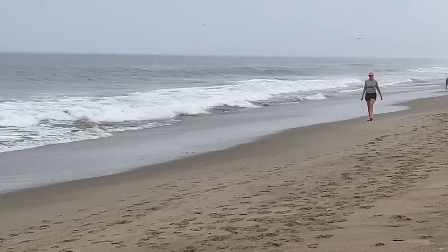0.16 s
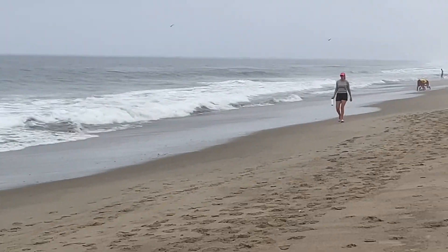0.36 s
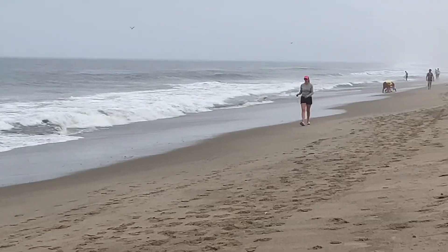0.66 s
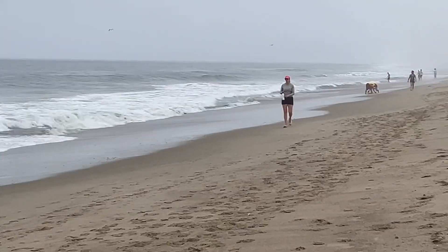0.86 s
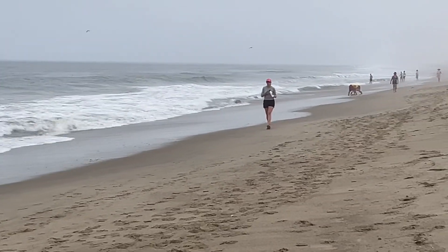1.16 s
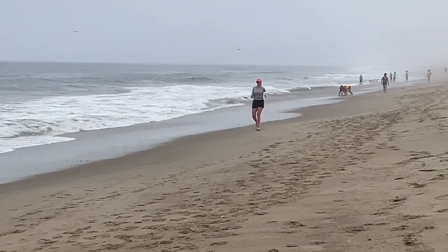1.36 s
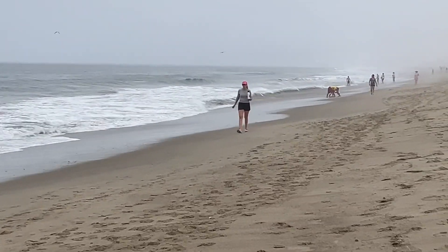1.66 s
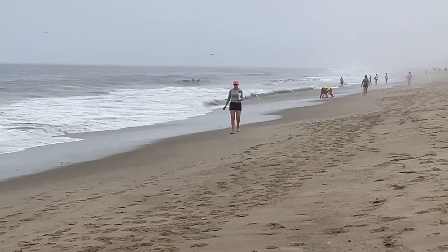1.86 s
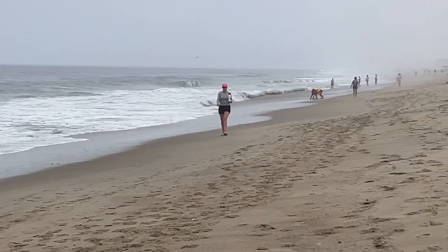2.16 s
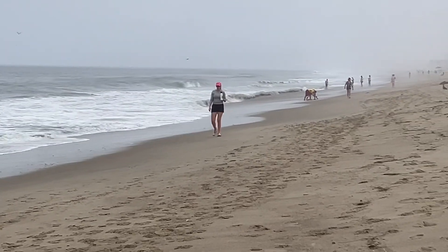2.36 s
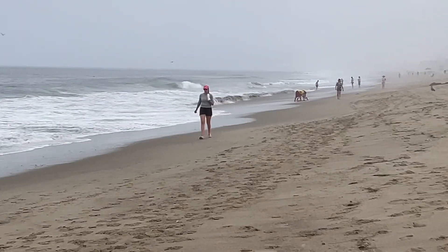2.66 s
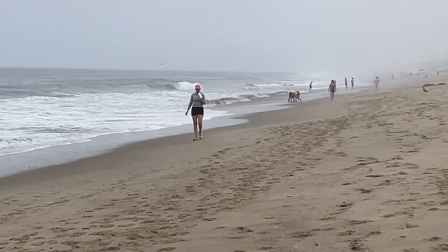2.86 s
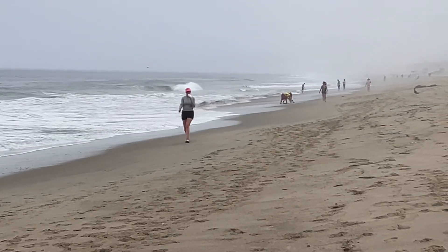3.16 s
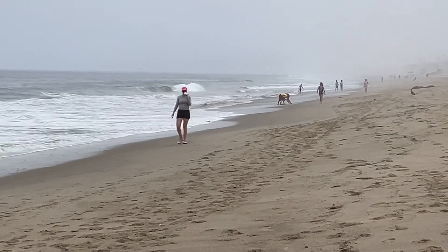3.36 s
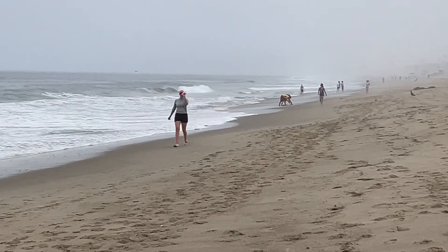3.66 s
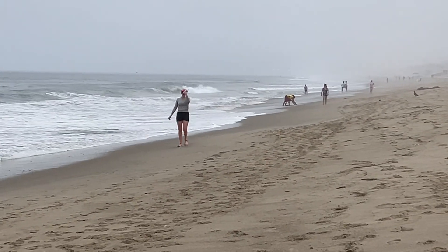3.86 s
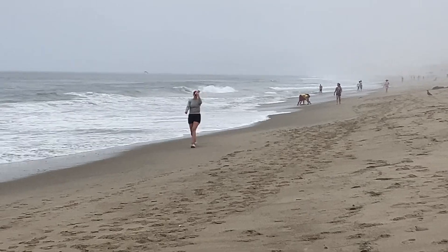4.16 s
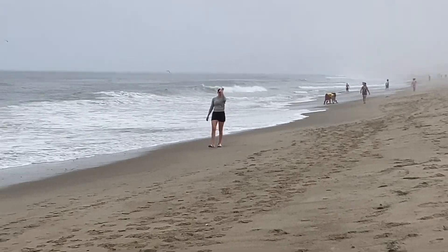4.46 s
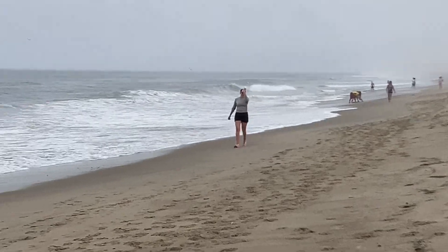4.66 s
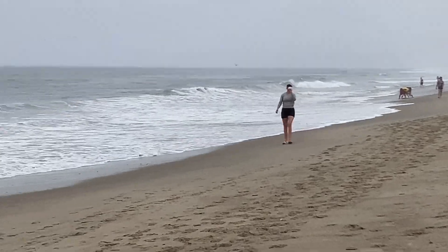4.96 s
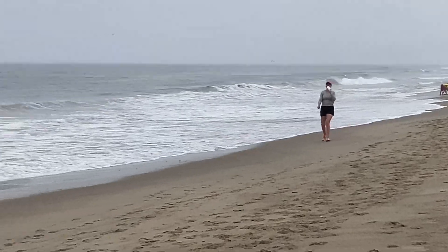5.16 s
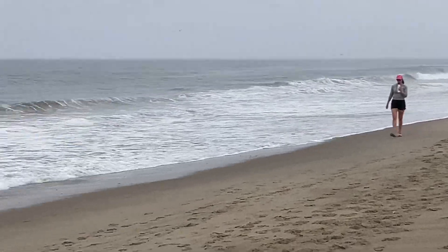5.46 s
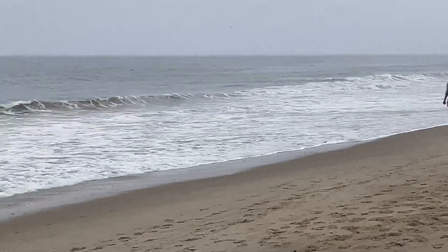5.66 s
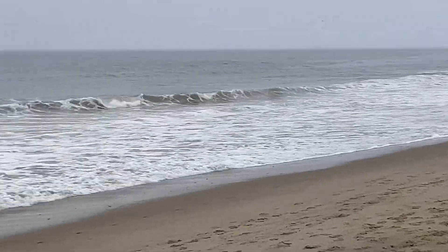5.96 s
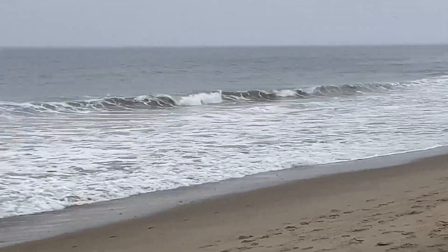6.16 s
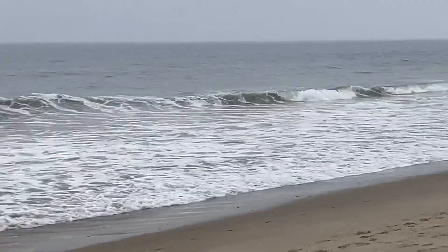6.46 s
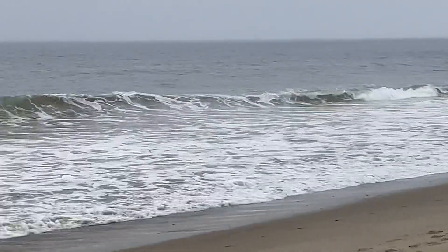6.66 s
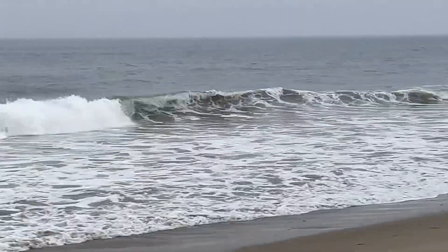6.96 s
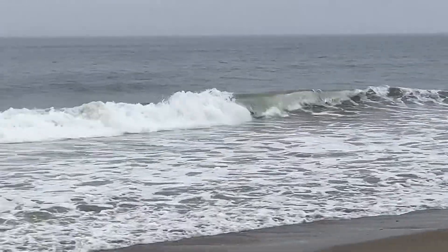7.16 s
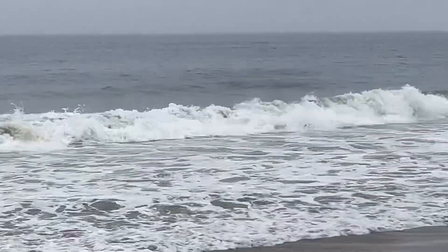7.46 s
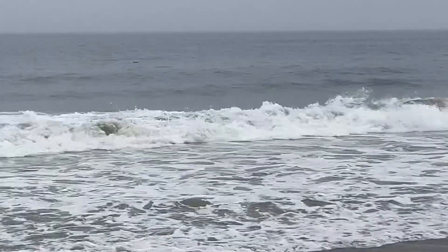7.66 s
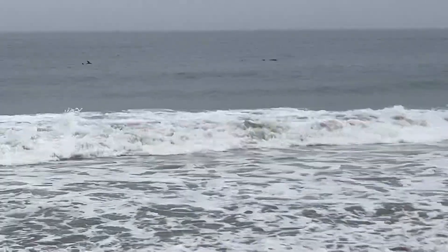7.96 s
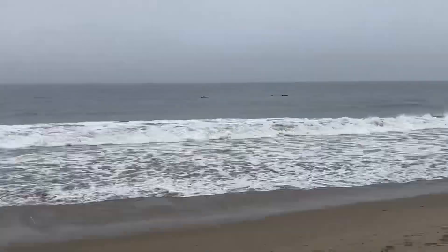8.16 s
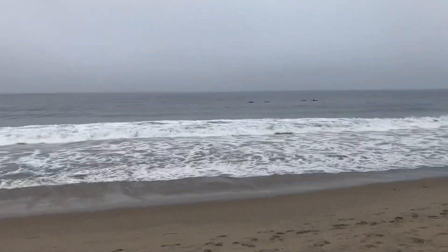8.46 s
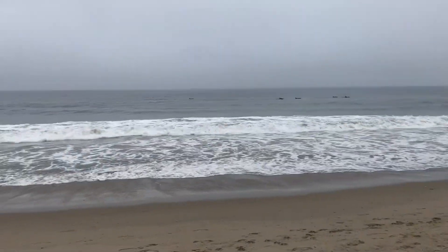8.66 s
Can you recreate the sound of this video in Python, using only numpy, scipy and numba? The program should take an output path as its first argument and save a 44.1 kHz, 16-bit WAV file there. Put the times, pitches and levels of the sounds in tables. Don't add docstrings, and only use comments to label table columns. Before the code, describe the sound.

A handheld stereo microphone on an open beach, sea to the left and ahead. Continuous broad surf roar, quiet at first beneath fluttering, bumping wind. A lull lets the water come forward, then a fresh wash splashes and fizzes up the sand. The roar grows fuller, gusts return with deep overloaded thuds, and a nearby breaker rumbles ahead, then to the right, over lingering hiss.

```python
import sys
import numpy as np
from scipy import signal
from scipy.fft import rfft, irfft, next_fast_len
from scipy.io import wavfile
from numba import njit

SR = 44100
rng = np.random.default_rng(int(sys.argv[2]) if len(sys.argv) > 2 else 0)


def voltage_ratio(decibels):
    exponent = np.asarray(decibels, float) / 20
    return 10 ** exponent


def int16_out(signal):
    q = np.round(np.clip(np.atleast_2d(signal).T, -1, 1) * 32767)
    wavfile.write(sys.argv[1], SR, q.astype(np.int16))


N = 388080
STEP = 40
PUFF_S = 0.017

# time_s, strength_db, large_eddies_db (their share)
WIND_STRENGTH = [(0, -32.5, 3), (0.9, -27, 2), (1.04, -31.5, -14), (2.0, -34, -4), (2.12, -38.5, -4),
                 (2.9, -39, -2.5), (3.55, -46.5, 5), (4.15, -28.5, -10.5), (4.6, -35, -0.5),
                 (5.45, -22, -16), (5.9, -22.5, -8), (6.15, -22.5, -16), (6.4, -24, -3), (6.56, -22, 1.5),
                 (7.04, -24, -1.5), (7.12, -25, 0), (7.45, -25, -12.5), (7.72, -33.5, -7), (7.95, -24, -21),
                 (8.22, -24.5, -16), (8.4, -30, -6), (8.8, -28.5, -11)]
# time_s, lift_db, size (0 small - 1 large)
WIND_PUFFS = [(0.07, 7, 0.33), (0.2, 2, 0.1), (.235, 8, .05), (.025, 2, .1), (0.1, 7.5, 0.1),
              (0.44, 6, 0.42), (0.54, 8, 0.54), (0.64, 8, 0.84), (0.76, 9.5, 0.82), (0.88, 8, 1),
              (1.3, 1, .1), (1.42, 9, 1), (1.75, 2, 0.97), (1.81, 5, 0.82), (1.95, 11, 0.42),
              (2.05, 8, 0.77), (2.3, 3, 0.62), (2.57, 6, .2), (2.76, 11, 0.61), (3.03, 9, .1),
              (4.41, 0, 0.82), (5.0, 3, 0.41), (5.27, 3.5, .1), (5.54, 6, 1), (5.62, 5, 0.77),
              (5.99, 3, .1), (6.07, 4, .3), (6.62, 4, .2), (6.8, 2.5, .1), (6.56, 4, 0.97),
              (6.705, -7, 0.98), (6.83, 10.5, 1), (6.97, 15, 0.6), (7.035, 13, 0.64), (7.31, 19, 0.82),
              (7.49, 9, 0.5), (8.08, 1, .5), (8.14, 4, .6), (8.54, 7, 1)]


def rms_one(x):
    return x / np.sqrt(np.mean(x ** 2) + 1e-20)


def in_time(rows):
    s, *columns = np.transpose(rows)
    grid_s = np.arange(N // STEP + 1) * STEP / SR
    return [np.interp(grid_s, s, column) for column in columns]


def per_sample(slow):
    return np.interp(np.arange(N) / STEP, np.arange(len(slow)), slow)


def held(slow):
    return np.repeat(slow, STEP)[:N]


def at_hz(points, hz):
    point_hz, value = np.transpose(points)
    return np.interp(np.log(hz), np.log(point_hz), value)


def drift(rate_hz):
    run_in = 2000
    r = np.exp(-2 * np.pi * STEP * rate_hz / SR)
    noise = rng.standard_normal(N // STEP + 1 + run_in)
    return rms_one(signal.lfilter([1], [1, -2 * r, r * r], noise)[run_in:])


def bumps(rows, width_s):
    s = np.arange(N // STEP + 1) * STEP / SR
    return sum(db * np.exp(-0.5 * ((s - at) / width_s) ** 2) for at, db in rows)


def band(x, low_hz, high_hz):
    run_in = 4096
    sos = signal.butter(2, [low_hz, high_hz], "band", fs=SR, output="sos")
    return signal.sosfilt(sos, np.concatenate([x[..., -run_in:], x], axis=-1))[..., run_in:]


@njit
def swept_resonance(x, cos_w, r):
    y = np.zeros_like(x)
    for i in range(2, len(x)):
        driven = (1 - r * r) / 2 * (x[i] - x[i - 2])
        y[i] = driven + 2 * r * cos_w[i] * y[i - 1] - r * r * y[i - 2]
    return y


def clicks(shape, per_s, spread_db):
    out = 1.0 * (rng.random(shape) < per_s / SR)
    hit = out > 0
    size_db = spread_db * np.minimum(rng.exponential(1, hit.sum()), 4)
    out[hit] = voltage_ratio(size_db) * rng.choice([-1, 1], hit.sum())
    return rms_one(out)


def pulse(s, peak_db, hz, cycles, glide):
    out, start = np.zeros(N), int(s * SR)
    length = min(int(4 * cycles * SR / hz), N - start)
    turns = np.arange(length) * hz / SR - 2 * cycles
    swell = np.exp(-2 * (turns / cycles) ** 2)
    out[start:start + length] = swell * np.cos(2 * np.pi * turns * (1 + glide * turns))
    return voltage_ratio(peak_db) * out


def pair(mid, side, alike, gain=1):
    alike = np.clip(alike, 0, 1)
    mid = held(gain * np.sqrt((1 + alike) / 2)) * mid
    side = held(gain * np.sqrt((1 - alike) / 2)) * side
    return np.array([mid + side, mid - side])


def right_late(x, lag):
    return np.array([x[0], np.interp(np.arange(N) - lag, np.arange(N), x[1])])


def water(colour, source, spread, tilt_db, shared_db, own_db, rate, pivot_hz=2400, finer=0, fizz_db=0):
    # pitch_hz, likeness (0-1)
    spot_likeness = [(100, .95), (400, .88), (1000, .93), (1950, .92), (2400, .62), (2800, .82),
                     (3700, .78), (4400, .55), (6200, .45), (7300, .3), (8600, .02), (15000, .02)]
    out, together = 0, drift(rate / 3)
    first_hz, last_hz = colour[0][0], colour[-1][0]
    edges = first_hz * 0.85 * 2 ** np.arange(0, np.log2(last_hz / first_hz) + 0.8, 0.4)
    for k, (low, high) in enumerate(zip(edges, np.minimum(edges[1:], 0.45 * SR))):
        hz = np.sqrt(low * high)
        gain_db = at_hz(colour, hz / 2 ** finer) + tilt_db * np.log2(hz / pivot_hz)
        gain_db = gain_db + fizz_db * (hz > 8000)
        gain_db = gain_db + shared_db * together + own_db * drift(rate)
        alike = at_hz(spot_likeness, hz) ** spread
        out = out + pair(*band(source[k % 2], low, high), alike, voltage_ratio(gain_db))
    return rms_one(out)


def roar():
    # time_s, level_db, tilt_db_per_octave (nearness),
    # right_late_samples, colour_up_octaves
    breakers = [(0, -36, -7.5, 9.6, 0.072), (1.3, -38.5, -3, 10.9, 0.041), (1.9, -36.5, -1, 14.6, 0.063),
                (2.7, -36.5, -2, 15.4, 0.18), (3.45, -38.5, 2.5, 13.3, 0.13), (3.7, -36.5, -1, 18.5, 0.14),
                (4.15, -33.5, -1, 22.6, 0.042), (4.62, -36.5, 0.5, 16.8, 0.1), (5.2, -33, 0, 18.7, -0.047),
                (5.9, -34, .8, 17.7, -0.0099), (6.5, -32, -0.3, 18.2, 0.04), (7.2, -32.5, -1, 17.2, 0.07),
                (7.9, -34, .5, 14.7, -0.027), (8.3, -36.5, -1, 15, -0.032), (8.8, -35.5, 1.5, 19, -0.087)]
    # pitch_hz, level_db per Hz
    roar_colour = [(90, -19), (150, -18.5), (300, -16), (420, -3.5), (580, 3), (780, -2), (1000, -2),
                   (1600, -9), (2200, -16.5)]
    level_db, tilt_db, lag, finer = in_time(breakers)
    noise = water(roar_colour, rng.standard_normal((2, 2, N)), spread=3.5, tilt_db=tilt_db,
                  shared_db=0.5, own_db=1.58, rate=8.9, pivot_hz=620, finer=finer)
    return right_late(per_sample(voltage_ratio(level_db + 5.5)) * noise, per_sample(lag))


def wash():
    # time_s, level_db, spread (1 = one spot), right_late_samples, fizz_db
    foam = [(0, -44, 3.6, 20.7, -1), (.9, -45.5, 4.6, 20.8, -1.8), (2.0, -47.5, 4.6, 20.4, -0.5),
            (3.2, -47.5, 2.4, 18.3, 1), (3.43, -47, 2.5, 20, 2), (3.58, -44, 2.4, 16.3, -1),
            (3.63, -38, 0.67, 17, .7), (4.0, -39.5, 1.1, 17.8, 0), (4.4, -37, 1.4, 18.4, -0.7),
            (5.2, -37.5, 2.1, 17.2, .1), (5.8, -38.5, 2.8, 18.1, -2.5), (6.5, -39, 3.9, 18, -1.5),
            (7.3, -39, 4.2, 18.8, -0.5), (7.7, -40.5, 4.1, 20, 0.5), (8.15, -39, 2.4, 20.8, 2),
            (8.35, -42, 4.8, 23, -1), (8.8, -41.5, 3.4, 29, 1.2)]
    # pitch_hz, level_db per Hz
    foam_colour = [(500, -7), (1000, 1.5), (1400, 5), (1650, 1.5), (2100, -0.5), (3200, -3), (4500, -8),
                   (5300, -8.5), (7000, -12), (9000, -16), (10100, -18.5), (11000, -19), (13000, -31),
                   (14300, -37), (15500, -21.5)]
    # time_s, lift_db
    surges = [
        (0.37, 0.5),
        (1.62, 1),
        (3.7, 3),
        (3.88, 5.5),
        (4.02, 4.5),
        (4.24, 3.5),
        (4.88, 0.5),
        (5.73, 0),
        (6.15, 0.5),
        (6.42, -1),
    ]
    # time_s, lift_db
    splashes = [
        (.375, 2.7),
        (3.635, 1.8),
        (3.87, 1.5),
        (4.13, 0.9),
    ]
    level_db, spread, lag, fizz_db = in_time(foam)
    octaves = np.log2(np.maximum(spread, 0.5))
    source = rng.standard_normal((2, 2, N)) + 0.26 * clicks((2, 2, N), 4000.0, spread_db=3.5)
    noise = water(foam_colour, source, 2 ** octaves, tilt_db=0.465 * (1 + octaves), shared_db=0.35,
                  own_db=0.9, rate=23.0, finer=0.13 * octaves, fizz_db=fizz_db)
    level_db = level_db + bumps(surges, width_s=0.067) + bumps(splashes, width_s=0.024)
    return right_late(per_sample(voltage_ratio(level_db + 6.5)) * noise, per_sample(lag))


def crest():
    # time_s, level_db, right_late_samples
    collapse = [
        (0, -70, 0.5),
        (6.6, -61, 0.5),
        (7.05, -36.5, 0.5),
        (7.5, -36.5, 1),
        (8.0, -37, -9),
        (8.4, -33, -10),
        (8.8, -34.5, -16),
    ]
    level_db, lag = in_time(collapse)
    noise = rms_one(band(rng.standard_normal((2, N)), 403, 787))
    gain = voltage_ratio(level_db + 2.2 * drift(17.0))
    return right_late(pair(*noise, 0.92 + 0 * lag, gain), per_sample(lag))


def bubble():
    # time_s, peak_db, pitch_hz
    bursts = [
        (3.462, -29.5, 2770),
    ]
    ring = sum(pulse(s, db, hz, cycles=5.6, glide=0.015) for s, db, hz in bursts)
    return ring * voltage_ratio([[1.0], [4.0]])


def wind():
    # time_s, right_late_samples, likeness (0-1)
    crossing = [(0, -6, 0.77), (.8, -20, 0.85), (1.4, 3, 0.67), (2.1, -16, 0.73), (3, -20, 0.76),
                (4, -8, 0.67), (4.7, 8, 0.8), (5.2, 13, 0.82), (5.8, 20, 0.7), (6.3, 12, 0.78),
                (7.4, 8, 0.91), (8, -1, 0.81), (8.8, -3, 0.94)]
    lag, alike = in_time(crossing)
    eddies = rng.standard_normal((2, N)) + 0.3 * clicks((2, N), 110.0, spread_db=2.0)
    large = pair(*buffet(eddies), alike) + lumps()
    small = pair(*-flutter(eddies), alike) + thumps() + ticks()
    return right_late(large, 0.27 * per_sample(lag)) + right_late(small, per_sample(lag))


def buffet(eddies):
    strength_db, large_db = in_time(WIND_STRENGTH)
    puffs_db = bumps([(s, db * size) for s, db, size in WIND_PUFFS], PUFF_S)
    level_db = strength_db + large_db + puffs_db - 1.5 + 0.57 * drift(31.0)
    return per_sample(voltage_ratio(level_db)) * rms_one(band(eddies, 42.4, 101.0))


def flutter(eddies):
    # time_s, rate_hz
    shedding = [(0.0, 205), (0.93, 150), (1.03, 300), (2.2, 290), (3.0, 340), (3.5, 370), (3.77, 210),
                (3.95, 370), (4.61, 200), (5.22, 310), (5.27, 215), (5.6, 145), (5.88, 180), (5.98, 186),
                (6.64, 187), (7.3, 170), (7.43, 320), (8.18, 154), (8.36, 300), (8.46, 140), (8.7, 271),
                (8.8, 170)]
    strength_db, _ = in_time(WIND_STRENGTH)
    puffs_db = bumps([(s, db * (1 - size)) for s, db, size in WIND_PUFFS], PUFF_S)
    level_db = strength_db + puffs_db - 2.0 + 1.46 * drift(45.0)
    pitch_hz = in_time(shedding)[0] * 2 ** (0.11 * drift(11.0))
    broad = band(eddies, 107.0, 430)
    cos_w = np.cos(2 * np.pi * 1.004 * per_sample(pitch_hz) / SR)
    r = np.exp(-np.pi * 230 / SR)
    tuned = np.array([swept_resonance(port, cos_w, r) for port in broad])
    return per_sample(voltage_ratio(level_db)) * rms_one(rms_one(tuned) + 0.5 * rms_one(broad))


def thumps():
    strikes = [(0.064, -25, 105), (0.148, -15, 144), (0.182, -22, 110), (0.305, -16, 94.5),
               (0.43, -18, 127), (0.544, -22, 95), (0.9, -15.5, 109), (0.936, -28, 134), (1.342, -30, 254),
               (1.654, -21, 189), (1.738, -22, 242), (1.828, -23, 225), (1.938, -21, 170),
               (2.025, -15, 292), (2.306, -32, 128), (2.593, -27, 199), (2.676, -31, 169),
               (2.755, -30, 139), (2.848, -25, 226), (3.01, -25, 257), (3.05, -26, 244),
               (3.163, -21.5, 228), (3.188, -25, 236), (3.341, -26, 230), (3.426, -34, 160),
               (3.598, -26.5, 216), (3.723, -24, 240), (3.921, -30, 245), (4.161, -20, 268),
               (4.196, -24, 234), (4.248, -21, 231), (4.422, -24, 112), (4.559, -28, 114), (4.67, -33, 132),
               (4.746, -30, 180), (5.022, -20, 234), (5.274, -27, 213), (5.357, -12, 188),
               (5.725, -15, 151), (5.857, -10, 158), (5.921, -16, 191), (6.285, -19, 159),
               (6.465, -15.5, 149.8), (6.533, -13, 132), (6.587, -12, 117), (6.7, -6.5, 117),
               (6.838, -9, 124), (6.969, -15, 118), (7.025, -7.5, 129), (7.292, -21, 120),
               (7.323, -18, 171), (7.492, -17, 235), (7.632, -23, 258), (8.45, -17, 181), (8.541, -25, 145),
               (8.676, -27, 257)]
    tail_db, tail_pitch, tail_late_cycles = -11, 0.57, 1.17
    out = np.zeros(N)
    for s, db, hz in strikes:
        out -= pulse(s - 2.2 / hz, db, hz, cycles=1.1, glide=-0.15)
        tail_s = max(s + (tail_late_cycles - 1.6 / tail_pitch) / hz, 0)
        out += pulse(tail_s, db + tail_db, hz * tail_pitch, cycles=0.804, glide=-0.15)
    return out


def lumps():
    rolls = [(.015, -20, 69.5), (.185, -19.5, 75), (.305, -25, 72), (.54, -26, 65), (.76, -21, 80),
             (.83, -23, 80), (1.23, -34, 50), (1.41, -33, 60), (4.42, -29, 80), (4.56, -22.5, 72),
             (4.98, -31, 60), (5.6, -27, 65), (6.499, -15.5, 70), (6.565, -10, 66), (6.597, -13, 66),
             (6.66, -21, 55), (6.725, -22, 68), (6.77, -15, 74), (6.89, -17, 78), (6.974, -15, 62),
             (7.005, -19, 62), (7.035, -9, 66), (7.23, -24, 80)]
    return sum(pulse(max(s - 2.2 / hz, 0), db, hz, cycles=1.1, glide=-0.08) for s, db, hz in rolls)


def ticks():
    strength_db, _ = in_time(WIND_STRENGTH)
    snaps = band(band(clicks(N, per_s=22.0, spread_db=1.2), 70, 650), 90, 900)
    level_db = -43 + 0.17 * (strength_db + 34.5)
    return per_sample(voltage_ratio(level_db)) * rms_one(snaps)


def spray():
    return voltage_ratio(-66) * rms_one(band(rng.standard_normal((2, N)), 15000, 17000))


def shaded(x):
    # pitch_hz, right_port_db
    body_shade = [(100, 0), (250, -0.5), (450, -3), (700, -4), (1100, -4.5), (1500, .5), (2000, -1.2),
                  (2400, 0.6), (3100, 3), (4300, 0.8), (5300, 0.3), (7000, 1), (16000, 0)]
    size = 2 * next_fast_len(N // 2)
    hz = np.arange(size // 2 + 1) * SR / size + 1
    cepstrum = irfft(np.log(voltage_ratio(at_hz(body_shade, hz))), size)
    cepstrum[1:size // 2] *= 2
    cepstrum[size // 2 + 1:] = 0
    right = irfft(rfft(x[1], size) * np.exp(rfft(cepstrum)), size)[:N]
    return np.array([x[0], right])


def shadow(x):
    # time_s, hollow_depth (0-1), hollow_hz, lift_beside (0-1)
    turning = [
        (0, 0.36, 2470, 0),
        (1.5, 0.6, 2520, 0.05),
        (3.4, 0.4, 2450, 0),
        (3.65, 0.76, 2270, 0.48),
        (4.3, 0.67, 2280, 0.5),
        (4.8, 0.76, 2320, 0.24),
        (5.9, 0.4, 2320, 0.25),
        (7.2, 0.48, 2460, 0.03),
        (8.0, 0.2, 2600, 0),
        (8.8, 0.4, 2400, 0),
    ]
    depth, hollow_hz, lift = map(per_sample, in_time(turning))

    def ring(hz, width_hz):
        cos_w = np.cos(2 * np.pi * hz / SR) + np.zeros(N)
        return swept_resonance(x[1], cos_w, np.exp(-np.pi * width_hz / SR))

    hollow = np.clip(depth, 0, 1) * ring(hollow_hz, width_hz=1620)
    beside = ring(1480, width_hz=530) + ring(3050, width_hz=530)
    return np.array([x[0], x[1] - hollow + lift * beside])


def with_ridge(x):
    # time_s, pitch_hz, lift (0-1)
    ridge_path = [(0, 1900, 0.6), (1.0, 1940, 0.5), (2.2, 2050, 0.18), (3.2, 2220, 0.1), (3.62, 1790, 0.3),
                  (3.88, 1970, 0.45), (4.2, 1650, .4), (4.6, 1750, 0.1), (5.0, 1900, 0.1), (5.7, 1760, 0.46),
                  (6.3, 1900, .3), (7.0, 2000, 0.53), (7.6, 1950, 0.45), (8.15, 1950, 0.5), (8.45, 1750, 0.2),
                  (8.8, 1650, 0.1)]
    hz, lift = map(per_sample, in_time(ridge_path))
    cos_w = np.cos(2 * np.pi * hz / SR)
    r = np.exp(-np.pi * 180 / SR)
    return x + np.clip(lift, 0, 1) * np.array([swept_resonance(port, cos_w, r) for port in x])


def scene():
    at_ports = with_ridge(shadow(shaded(roar() + wash() + wind())))
    return at_ports + spray() + crest() + bubble()


def steered(frames, hz, s):
    # pitch_hz, share (0-1), lead_radians
    steered_band = [(6600, 0, 0), (6950, .8, 0), (7500, .82, .2), (7700, .68, .8), (8300, .66, 2.5),
                    (8500, 0, 2.9)]
    # time_s, share (0-1)
    steering = [(0, .85), (1.4, .85), (1.75, 1.15), (2.3, .9), (3.4, .9), (3.7, .8), (5.1, .75), (6.0, .85),
                (6.25, 1.15), (6.7, .9), (7.6, 1.0), (8.8, 1.15)]
    band_hz, share, lead = np.transpose(steered_band)
    share, lead = [np.interp(hz, band_hz, column)[:, None] for column in (share, lead)]
    share = np.clip(share * np.interp(s, *np.transpose(steering)), 0, 0.995)
    left, right = frames.sum(0) / 2, (frames[0] - frames[1]) / 2
    right = share * np.exp(1j * lead) * left + np.sqrt(1 - share ** 2) * right
    return np.array([left + right, left - right])


def joint_stereo(x):
    # which (0 sum, 1 difference), low_from_hz, low_to_hz, high_from_hz, high_to_hz,
    # other_lift_db
    starved = [(0, 8300, 8860, 9620, 9750, 3), (1, 10380, 11060, 11750, 12400, 3),
               (0, 12400, 13150, 14300, 14520, 3), (1, 14500, 15200, 22050, 22051, 2),
               (0, 15720, 15750, 22050, 22051, 0)]
    edge_bias = (1.8, 1.1, 1, .5, 1)
    fed_s = [6.89, 7.89]
    # time_s,
    # pitch_hz, length_s
    dropouts = [
        (3.928, 3640, .03),
        (4.145, 3640, .05),
        (8.03, 5000, .05),
        (8.18, 4950, .07),
    ]
    hz, s, frames = signal.stft([x[0] + x[1], x[0] - x[1]], SR, "cosine", 2048)
    frames = steered(frames, hz, s)
    count = frames.shape[2]
    for k, (which, low_a, low_b, high_a, high_b, lift_db) in enumerate(starved):
        which = int(which)
        turn = np.cumsum(rng.random(count) < 0.8)
        hops = rng.random((2, count + 1))[:, turn]
        low = low_a + (low_b - low_a) * hops[0] ** edge_bias[k]
        high = high_b - (high_b - high_a) * hops[1] ** 3
        if k == 0:
            low[np.abs(s[:, None] - np.array(fed_s)).min(1) < 0.014] = SR
        empty = (hz[:, None] > low) & (hz[:, None] < high)
        frames[which] *= np.where(empty, voltage_ratio(-70), 1)
        frames[1 - which][(hz > low_a) & (hz < high_b)] *= voltage_ratio(lift_db)
    for at, centre_hz, length_s in dropouts:
        gap = np.ix_(np.abs(hz - centre_hz) < 140, np.abs(s - at) < length_s / 2)
        frames[0][gap] *= voltage_ratio(-30)
    total, difference = signal.istft(frames, SR, "cosine", 2048)[1][:, :N] / 2
    return np.array([total + difference, total - difference])


def band_limit(x):
    return signal.sosfilt(signal.butter(12, 15850, fs=SR, output="sos"), x)


def record(dry):
    cut = signal.sosfilt(signal.butter(2, 42, "high", fs=SR, output="sos"), dry)
    mix = joint_stereo(0.59 * np.tanh(cut / 0.66))
    return band_limit(mix)


dry = scene()
out = record(dry)
int16_out(out)
```